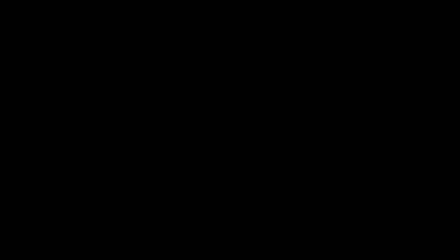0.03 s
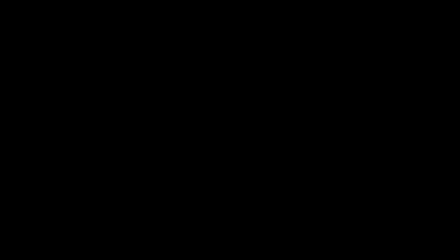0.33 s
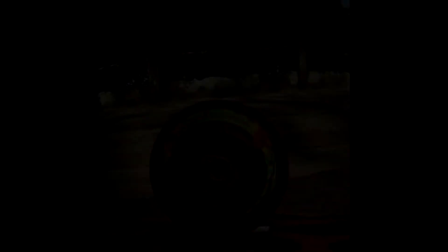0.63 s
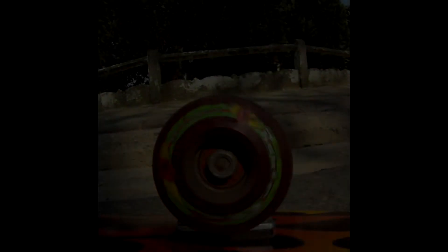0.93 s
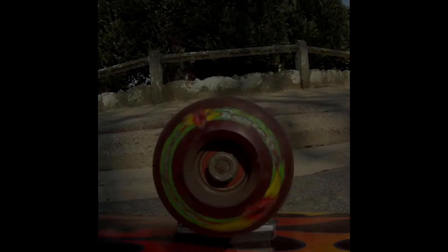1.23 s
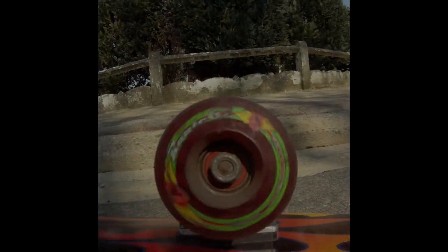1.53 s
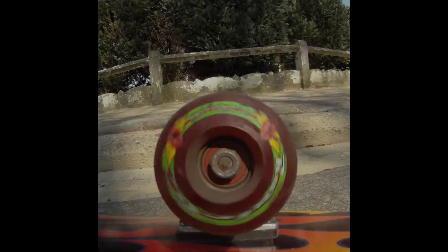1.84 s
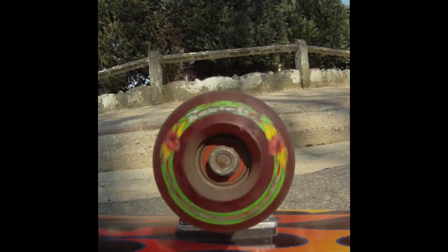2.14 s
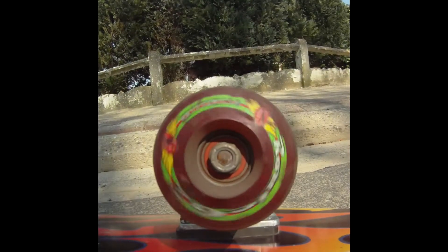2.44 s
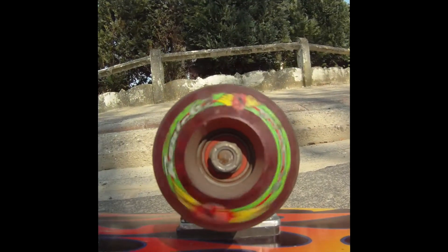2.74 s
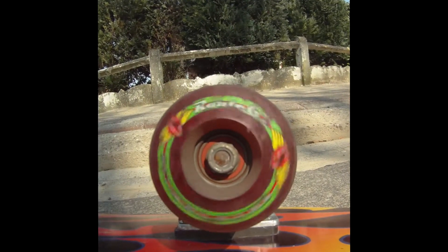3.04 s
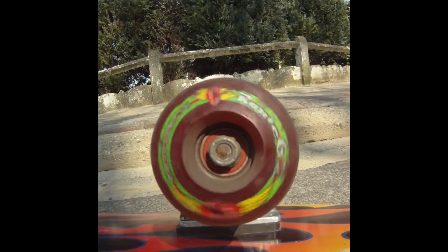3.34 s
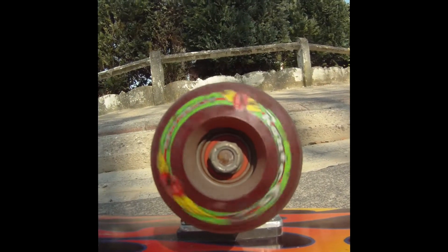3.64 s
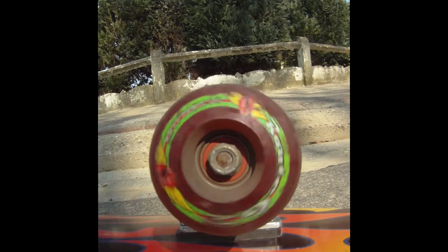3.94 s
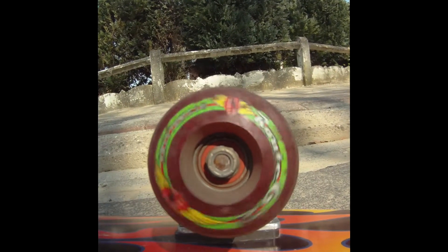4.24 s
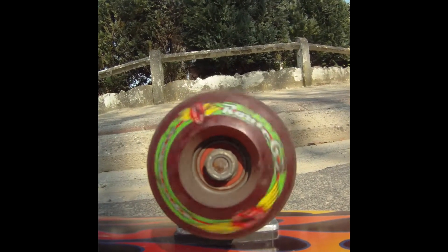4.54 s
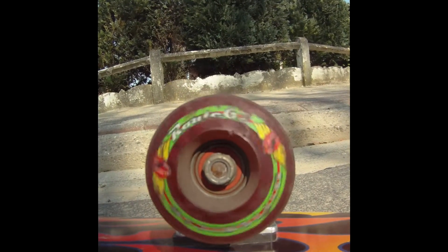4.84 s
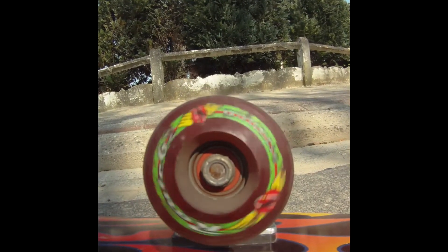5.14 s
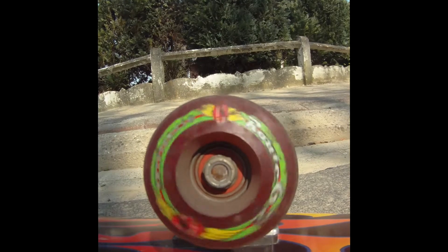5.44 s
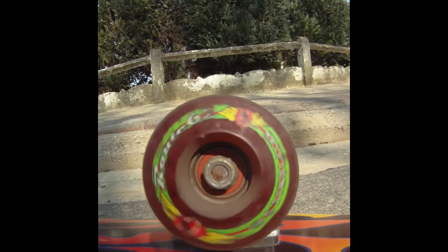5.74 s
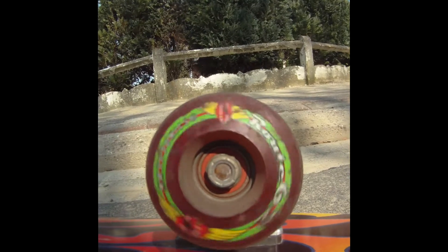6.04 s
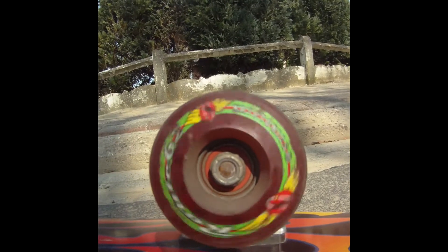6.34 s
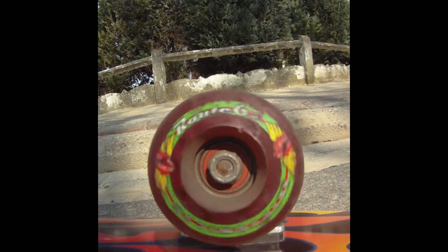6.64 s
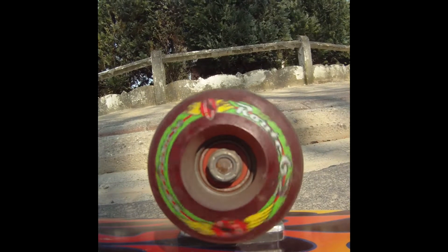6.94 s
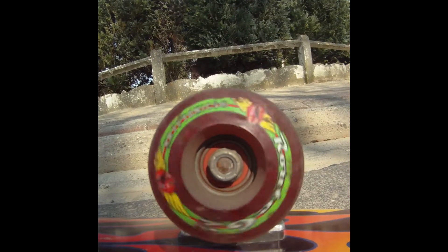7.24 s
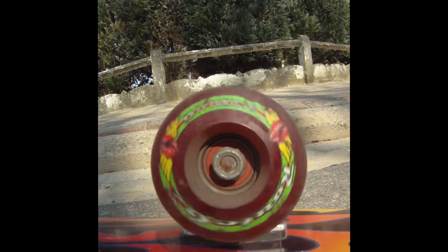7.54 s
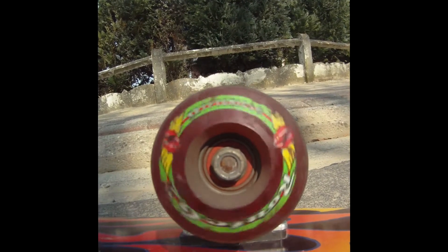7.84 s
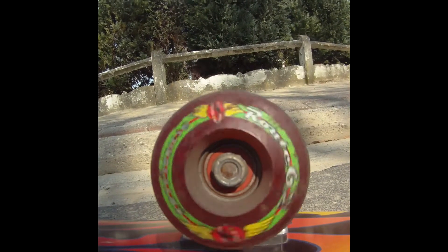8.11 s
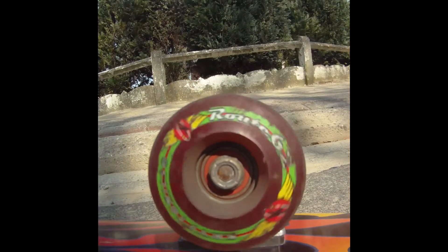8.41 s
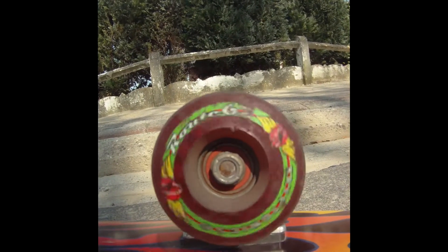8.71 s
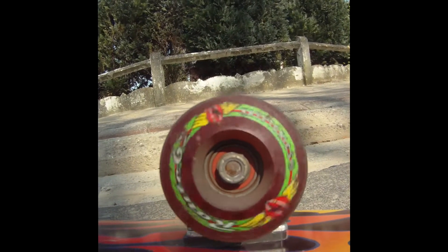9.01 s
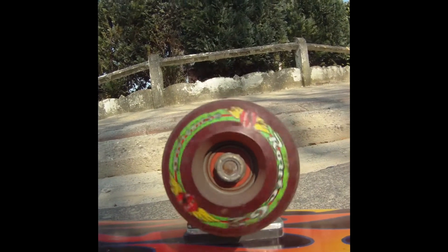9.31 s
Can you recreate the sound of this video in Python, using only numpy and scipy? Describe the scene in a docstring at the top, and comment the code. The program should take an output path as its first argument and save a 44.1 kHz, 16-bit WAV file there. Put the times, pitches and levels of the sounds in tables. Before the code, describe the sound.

A longboard fades in, rolling down an asphalt road outdoors. Wheels and deck make a steady hollow roar topped by a fine rattle and thin, gritty fizz. Grit ticks under the wheels and small pits softly knock the deck. Low wind buffets the microphone, which rides beside a wheel, with one strong gust before the middle. The board slows slightly, its rattle easing as it rolls on.

```python
"""A longboard fades in, rolling down an asphalt road; a small camera rides on the deck beside a wheel.
The grain of the road shakes wheels, trucks and deck into a hollow roar, and the camera holds each of its
coarse samples, mirroring that roar into a thin, gritty fizz. Wind buffets the microphone, grit ticks
and small pits knock the deck. After two seconds the board starts to slow a little; the biggest gust
hits near 3.6 s, and near 7.4 s the level dips briefly."""
import sys
import numpy as np
from scipy import signal
from scipy.fft import rfft, irfft
from scipy.io import wavfile

SR = 44100
rng = np.random.default_rng(int(sys.argv[2]) if len(sys.argv) > 2 else 0)


def int16_out(signal):
    """Quantize to a 16-bit WAV file."""
    q = np.round(np.clip(np.atleast_2d(signal).T, -1, 1) * 32767)
    wavfile.write(sys.argv[1], SR, q.astype(np.int16))


N = 413216
TAPS = 8192
TIME = np.arange(N) / SR
BINS_HZ = np.fft.rfftfreq(TAPS, 1 / SR)


def amp(db):
    """Decibels to gain."""
    return 10 ** (np.asarray(db) / 20)


def rms(x):
    """Root mean square."""
    return np.sqrt(np.mean(x ** 2) + 1e-20)


def spectrum(points):
    """An EQ curve: gain per bin through (f/Hz, level/dB) points on a log-frequency axis."""
    hz, db = np.transpose(points)
    return amp(np.interp(np.log(BINS_HZ + 1), np.log(hz), db))


def resonances(modes):
    """Gain per bin of steep-sided (f/Hz, width/Hz, level/dB) resonances."""
    return np.sqrt(sum(amp(db) ** 2 / (1 + (2 * (BINS_HZ - hz) / width) ** 4) for hz, width, db in modes))


def ring(gain):
    """The minimum-phase impulse response with this gain per bin."""
    log_gain = np.log(np.maximum(gain, 1e-5))
    mirrored = np.concatenate([log_gain, log_gain[-2:0:-1]])
    return np.fft.ifft(np.exp(np.conj(signal.hilbert(mirrored)))).real[:TAPS // 2]


def through(x, response):
    """Plays x through an impulse response."""
    return signal.oaconvolve(x, response)[:N]


def band(x, low_hz, high_hz, order=4):
    """Band-pass without delay."""
    hz = np.fft.rfftfreq(N, 1 / SR) + 1e-3
    low_cut = 1 + (low_hz / hz) ** (2 * order)
    high_cut = 1 + (hz / high_hz) ** (2 * order)
    return irfft(rfft(x) / np.sqrt(low_cut * high_cut), N)


def flicker(low_hz, high_hz):
    """A random wobble of unit RMS between two rates."""
    wobble = band(rng.standard_normal(N), low_hz, high_hz, order=1)
    return wobble / rms(wobble)


def speed(s, slows_from_s=2.11, loss_per_s=0.07):
    """The board's share of full speed: it holds, then falls steadily."""
    return np.clip(1 - loss_per_s * np.maximum(s - slows_from_s, 0), .1, 1)


def at_level(x, db, speed_power):
    """Sets x to a level at full speed and rides it down as the board slows."""
    return x / rms(x) * amp(db) * speed(TIME) ** speed_power


def road(stones_per_s=12000, size_spread_db=2.):
    """Tiny blows on the wheels from the stones of the asphalt."""
    hits = rng.random(N) < stones_per_s / SR
    return hits * rng.standard_normal(N) * amp(size_spread_db * rng.standard_normal(N))


def board(roar_db=-28, rattle_db=-37, shake_db=0.7, split_hz=850):
    """The road rings the board: a low roar, and a fine rattle that speed wakes and wheel load shakes."""
    # resonances of deck, trucks, wheels and camera case: f/Hz, width/Hz, level/dB
    modes = [(78, 29, -23), (228.6, 28, -20.5), (429.4, 94, -5.5), (486.3, 30, -1.5), (522.4, 68, -2.6),
             (629.7, 55, -2.5), (684, 39, -11.4), (792.7, 39, -12), (917.5, 59, -18.5), (1041, 54, -22),
             (1225, 105, -19.5), (1431, 90, -19.5), (1580, 57, -27), (1701, 52, -21.5), (1780, 71, -22.5),
             (1897, 103, -27.5), (2044, 78, -26.5), (2146, 89, -28), (2307, 150, -24.5), (2379, 100, -16.5),
             (2650, 66, -30.5), (2798, 163, -26.0), (2955, 100, -31), (3058, 138, -24.5), (3374, 125, -36),
             (4580, 84, -41.5)]
    # broad body between the resonances: f/Hz, level/dB
    body = [(20, -32.5), (60, -24.5), (150, -19.5), (300, -30.5), (800, -40), (2000, -33), (2550, -47.3),
            (3500, -40), (4200, -48.5), (5200, -44), (5800, -57.5)]
    # coarseness of the asphalt, as the strength of its blows: t/s, level/dB
    asphalt = [(0.12, -0.6), (0.9, -2.2), (1.5, -3), (1.62, -0.35), (3.55, 0.3), (4.3, -0.1), (5.0, -0.5),
               (5.5, 0.1), (6.7, 0.5), (7.3, 0.1), (8.2, 0.5), (8.8, -1.5), (9.35, 1)]
    response = ring(np.hypot(resonances(modes), spectrum(body)))
    force, wheel_load = road(), flicker(6.4, 70)
    coarse_db = np.interp(TIME, *np.transpose(asphalt))
    lift, knocks = pits(response, split_hz)
    roar = band(through(force * (1 - lift), response), 0, split_hz, order=5)
    roar = at_level(roar, roar_db + coarse_db, speed_power=0.27)
    shaken = through(force * amp(shake_db * wheel_load), response)
    rattle = shaken - band(shaken, 0, split_hz, order=5)
    rattle = at_level(rattle, rattle_db + 0.58 * coarse_db, speed_power=1.72)
    return roar + knocks + rattle


def wind(steady_db=-48.5, lump_db=1.0, drift_db=0.9, attack_s=0.076, release_s=.1):
    """Air streams past the microphone in low, lumpy buffets; each gust rises, holds and dies away."""
    # colour of the wind: f/Hz, level/dB
    colour = [(8, -31), (22, -6), (38, 3.5), (75, 4.5), (130, -4.5), (230, -11), (400, -16.5), (1200, -56)]
    # gusts: start t/s, length/s, level/dB over the steady wind
    gusts = [(0.36, 0.55, 4.5), (1.3, 0.11, 5), (3.45, .2, 11), (3.58, 0.31, 15), (3.897, 0.67, 10),
             (8.15, 1.2, 3)]
    air = through(rng.standard_normal(N), ring(spectrum(colour)))
    buffeting = amp(lump_db * flicker(5.46, 20) + drift_db * flicker(.7, 3))
    gust_db = np.zeros(N)
    for s, length, db in gusts:
        rise = (TIME - s) / attack_s
        fall = 1 - (TIME - s - length) / release_s
        gust_db = np.maximum(gust_db, db * np.clip(np.minimum(rise, fall), 0, 1))
    return at_level(air * buffeting, steady_db + gust_db, speed_power=0.66)


def grit(ring_width_hz=340, crush_s=0.00045, crumb_count=150, crumb_db=-41., dull_below_db=-26.):
    """Each piece of grit cracks in a short burst and rings at its own pitch; faint crumbs tick between."""
    # grit snapping out from under a wheel: t/s, peak level/dB, ring f/Hz
    pieces = [(0.9512, -20.5, 3880), (1.1732, -36, 3720), (1.2681, -15, 3900), (1.4147, -32, 3750),
              (1.4451, -36, 3790), (2.587, -27, 3880), (2.9168, -31, 4500), (3.1039, -37, 3920),
              (3.4675, -34, 4580), (4.4338, -37, 4570), (4.5526, -32, 3810), (4.9147, -32, 3750),
              (5.422, -37, 4700), (5.455, -33, 3850), (6.988, -41, 4650), (7.6141, -36, 4590),
              (7.9224, -33, 3840), (8.1963, -37, 3920)]
    # the wheel's answer to the snap: f/Hz, width/Hz, level/dB against the grit's undamped ring
    wheel_modes = [(1400, 600, -0.5), (2130, 370, -4), (2820, 560, 2), (5000, 1800, -20)]
    when, size, pitch = rng.random((crumb_count, 3)).T
    crumb_s = when * (N / SR)
    speed_db = 20 * np.log10(speed(crumb_s))
    crumbs = np.transpose([crumb_s, crumb_db + .7 * speed_db + 3 * size, 3500 + 1500 * pitch])
    age = np.arange(256) / SR
    ticks = np.zeros(N + TAPS)
    for s, db, hz in np.vstack([pieces, crumbs]):
        crack = (age == 0) + .06 * rng.standard_normal(len(age)) * np.exp(-age / crush_s)
        # the wheel damps small pieces: their ring is wider and weaker
        damping = np.clip(amp(dull_below_db - db), 1, 3)
        grit_mode = (hz, ring_width_hz * damping, -10 * np.log10(damping))
        tick = signal.fftconvolve(crack, ring(resonances([*wheel_modes, grit_mode])))
        ticks[round(s * SR):][:len(tick)] += amp(db) * tick / abs(tick).max()
    return ticks[:N]


def pits(response, cutoff_hz, lift_depth=0.42, lift_s=0.0088):
    """A wheel unloads while it spans a pit, then the far edge gives the deck one soft knock."""
    # pits in the asphalt: t/s, peak level/dB ahead of the low-pass
    pit_hits = [(1.562, -15), (1.91, -16.5), (2.631, -14), (3.357, -14.5), (3.457, -15.5), (3.865, -13.5),
                (4.57, -17), (5.078, -17), (5.384, -13), (5.547, -12), (6.16, -15), (7.057, -18),
                (7.197, -15), (7.663, -18.5), (7.938, -16), (8.309, -13.5), (8.642, -17.5), (8.687, -16),
                (8.766, -15)]
    times, levels_db = np.transpose(pit_hits)
    spans = sum(np.exp(-((TIME - s + lift_s / 2) / lift_s) ** 2) for s in times)
    lift = np.clip(lift_depth * spans, 0, 1)
    blows = np.bincount(np.round(times * SR).astype(int), amp(levels_db), N)
    knocks = band(through(blows, response / abs(response).max()), 0, cutoff_hz)
    return lift, knocks


def scene():
    """Board, grit and wind at one microphone."""
    return (board() + grit() + wind())[None]


def record(dry):
    """The sound fades in and dips once; the camera holds each coarse sample, mirroring it into fizz."""
    fade_start_s, fade_s = 0.11, 1.045
    dip_s, dip_half_s, dip_depth = 7.391, 0.017, 0.97
    hold_hz, top_hz = 12000, 15330
    fade = np.clip((TIME - fade_start_s) / fade_s, 0, 1)
    dip = 1 - dip_depth * np.maximum(1 - abs(TIME - dip_s) / dip_half_s, 0)
    coarse = signal.resample_poly(dry[0] * fade * dip, hold_hz, SR, window=("kaiser", 6))
    held = signal.resample(np.repeat(coarse, 4), round(len(coarse) * SR / hold_hz))[:N]
    high_cut = signal.firwin(511, top_hz, window=("kaiser", 9), fs=SR)
    return signal.oaconvolve(held, high_cut, "same")[None]


dry = scene()
out = record(dry)
int16_out(out)
```